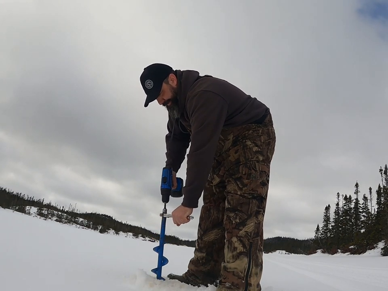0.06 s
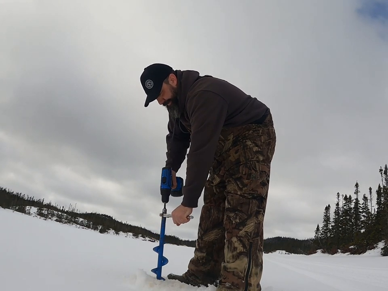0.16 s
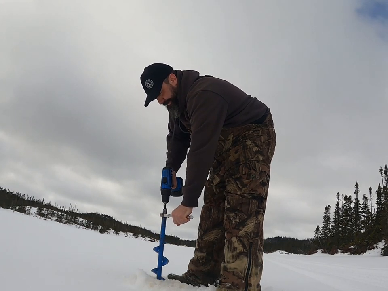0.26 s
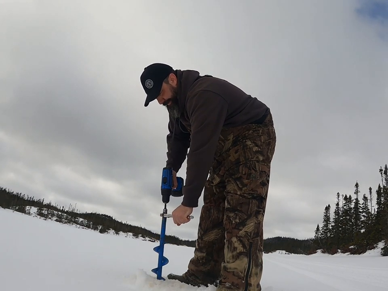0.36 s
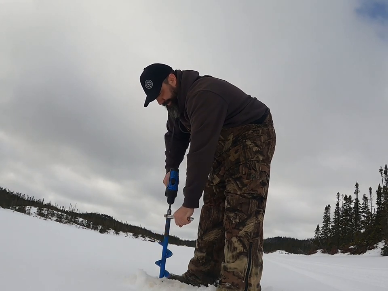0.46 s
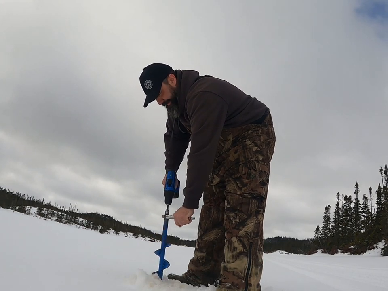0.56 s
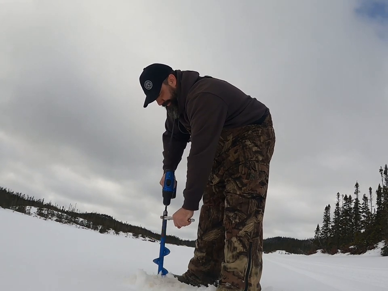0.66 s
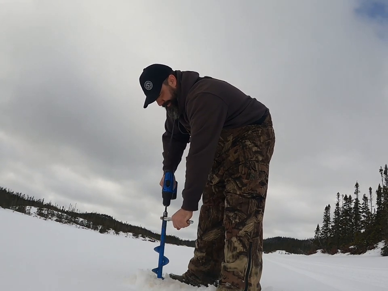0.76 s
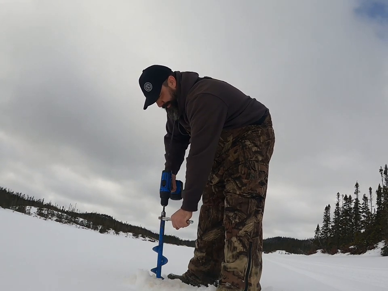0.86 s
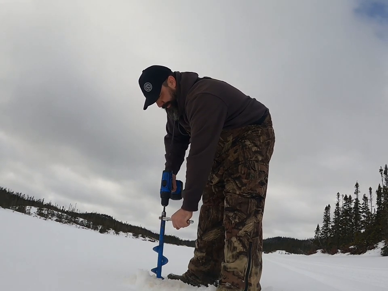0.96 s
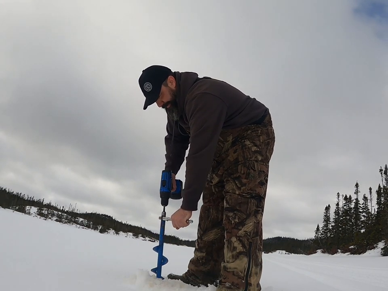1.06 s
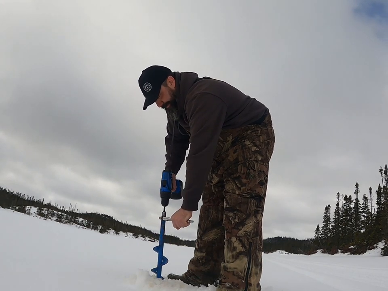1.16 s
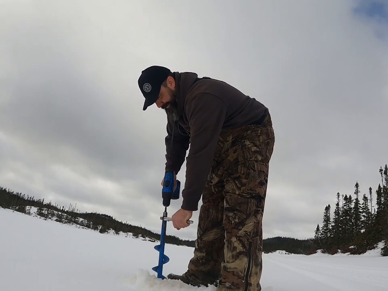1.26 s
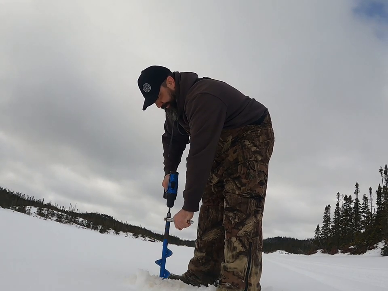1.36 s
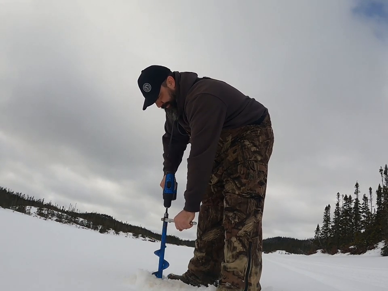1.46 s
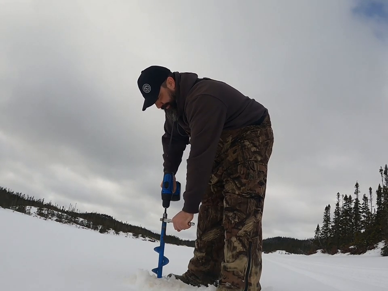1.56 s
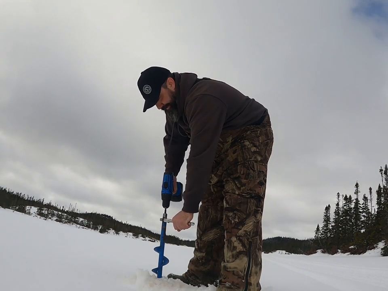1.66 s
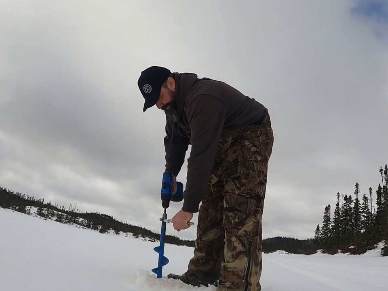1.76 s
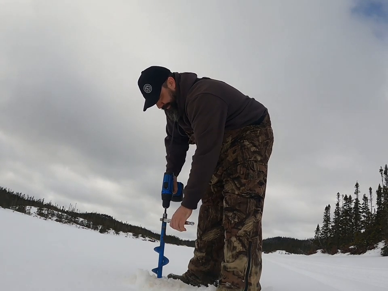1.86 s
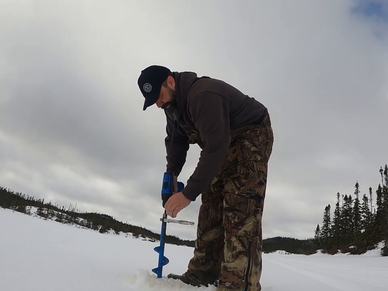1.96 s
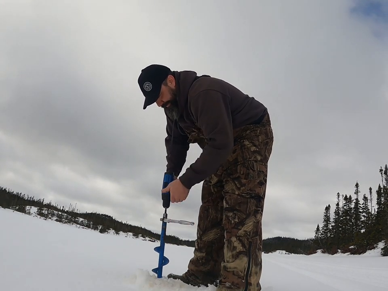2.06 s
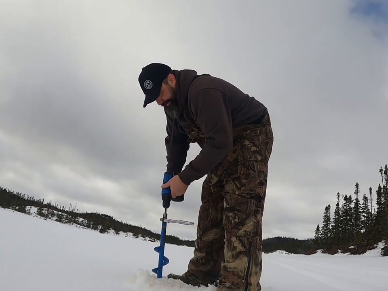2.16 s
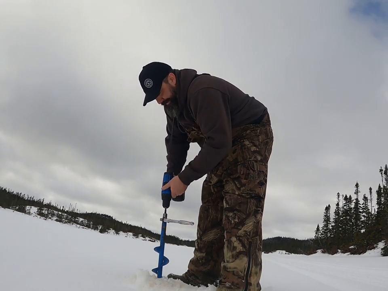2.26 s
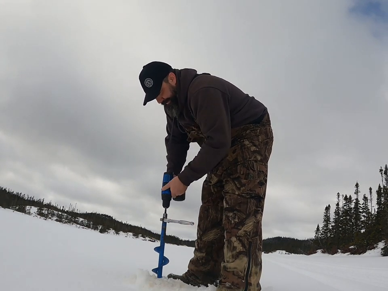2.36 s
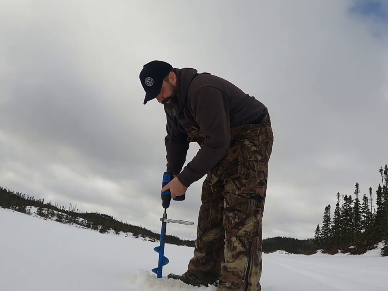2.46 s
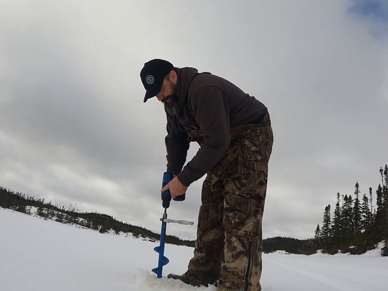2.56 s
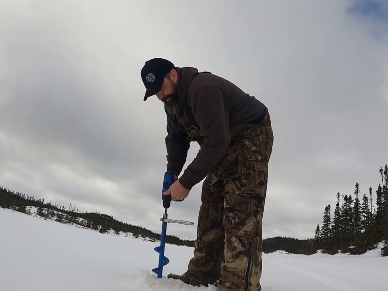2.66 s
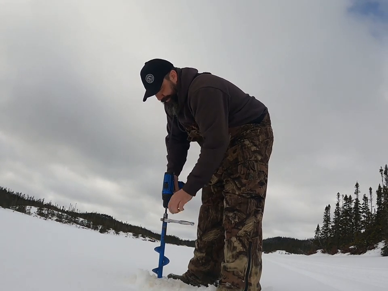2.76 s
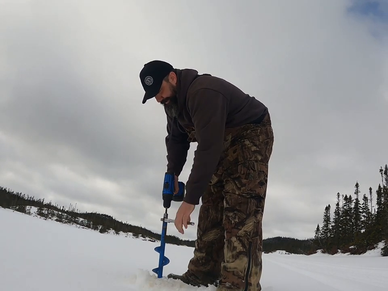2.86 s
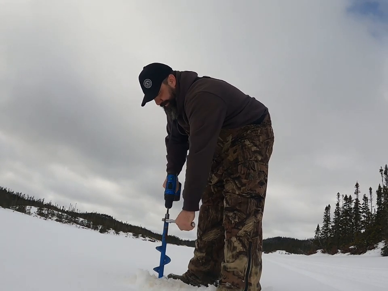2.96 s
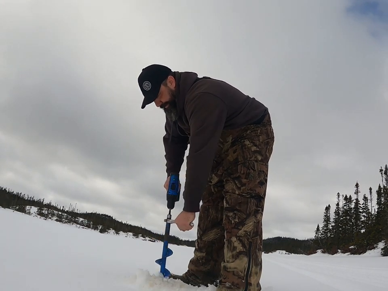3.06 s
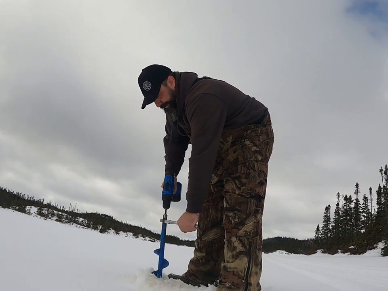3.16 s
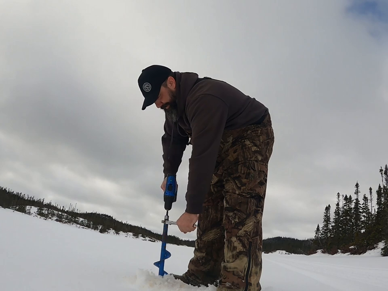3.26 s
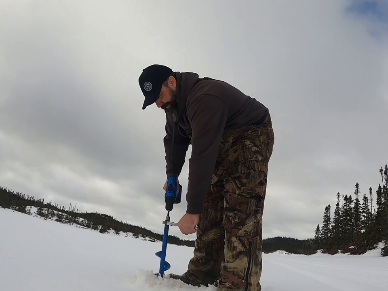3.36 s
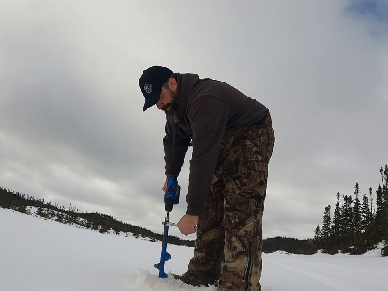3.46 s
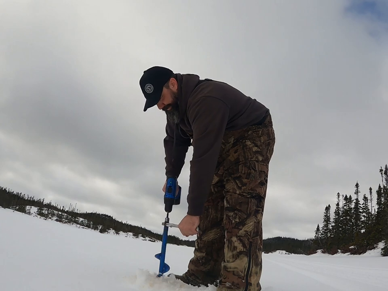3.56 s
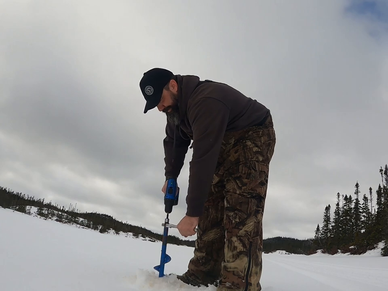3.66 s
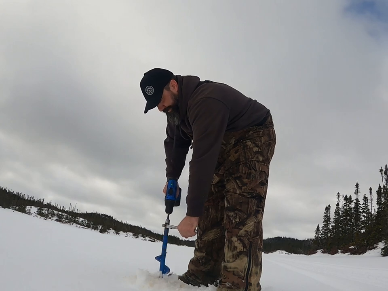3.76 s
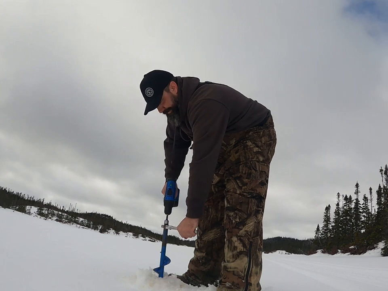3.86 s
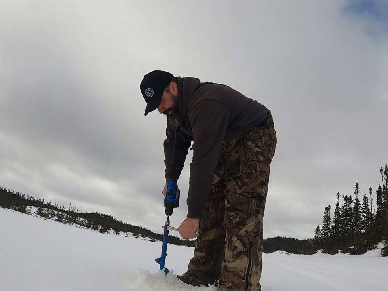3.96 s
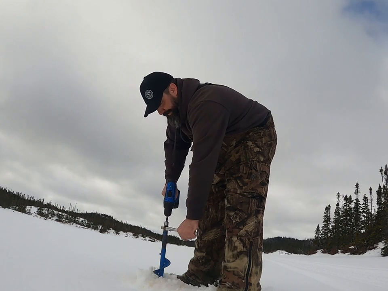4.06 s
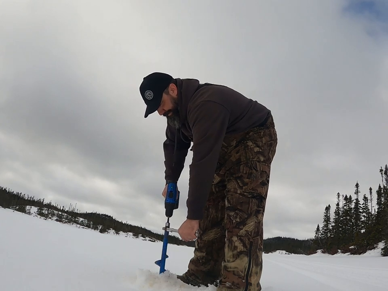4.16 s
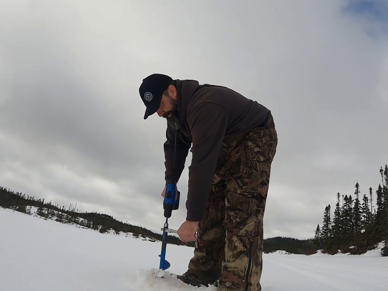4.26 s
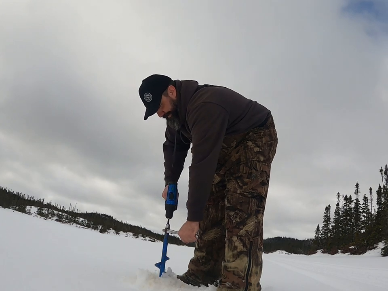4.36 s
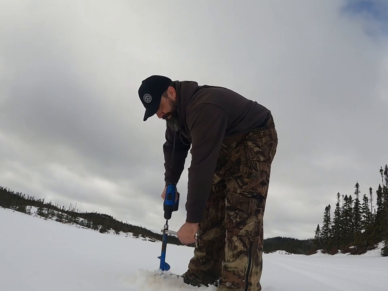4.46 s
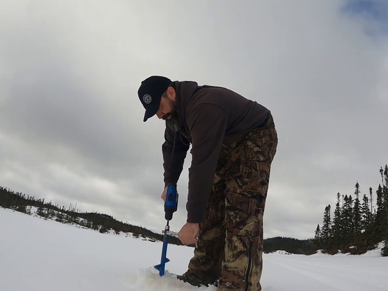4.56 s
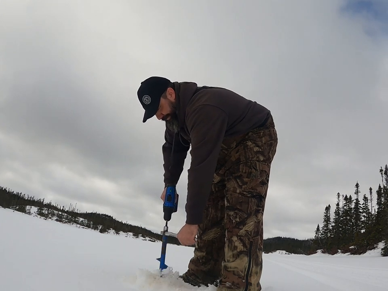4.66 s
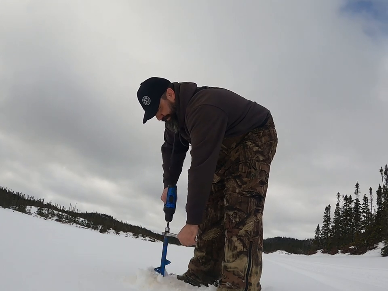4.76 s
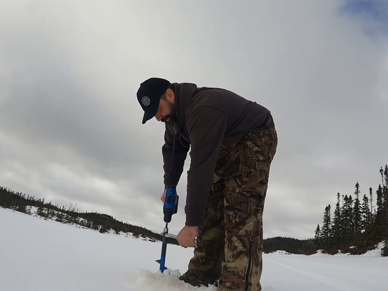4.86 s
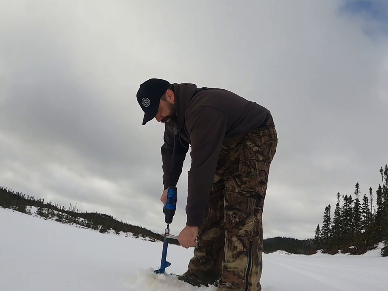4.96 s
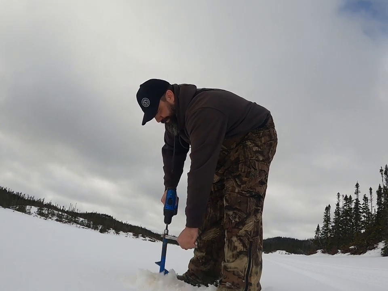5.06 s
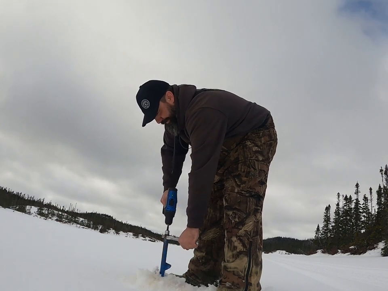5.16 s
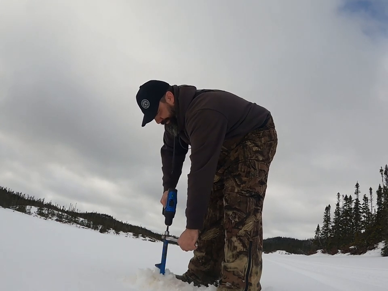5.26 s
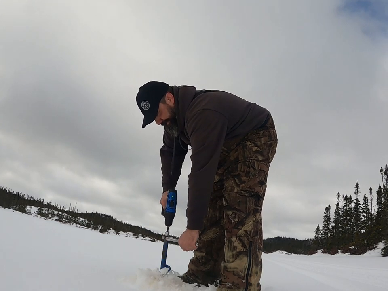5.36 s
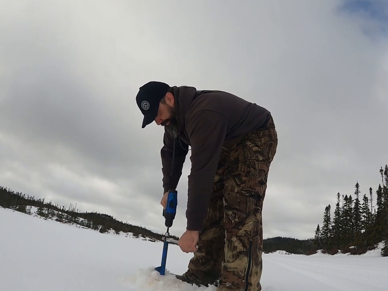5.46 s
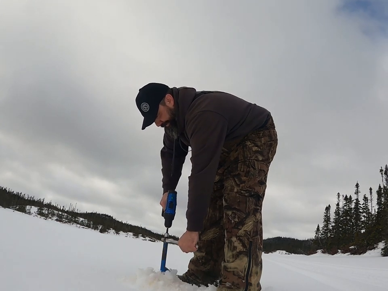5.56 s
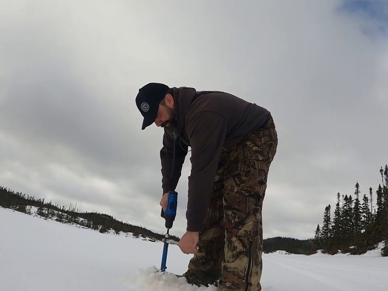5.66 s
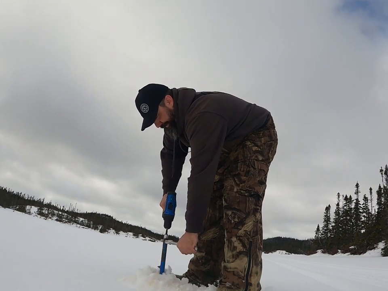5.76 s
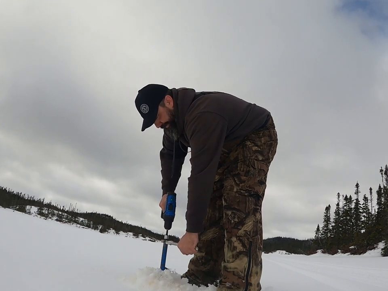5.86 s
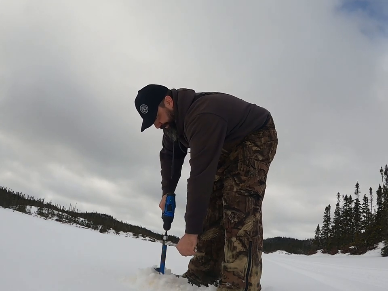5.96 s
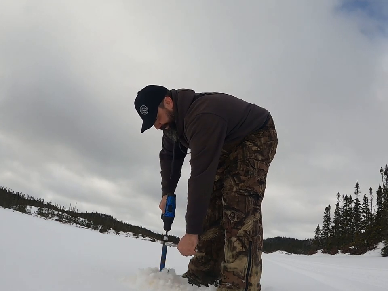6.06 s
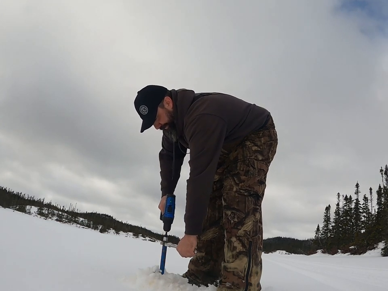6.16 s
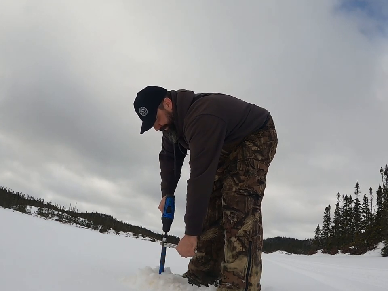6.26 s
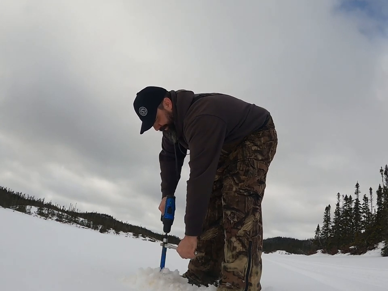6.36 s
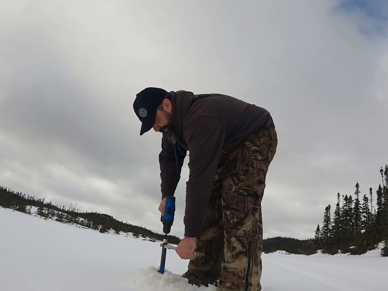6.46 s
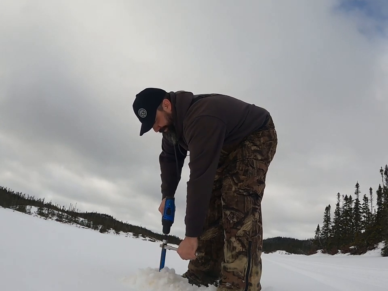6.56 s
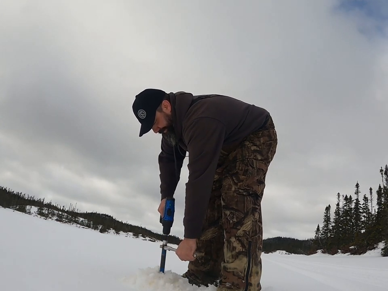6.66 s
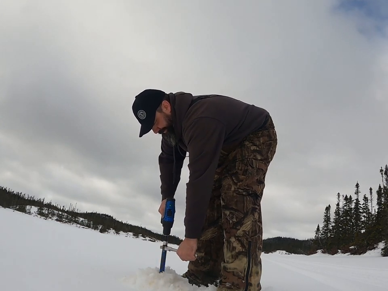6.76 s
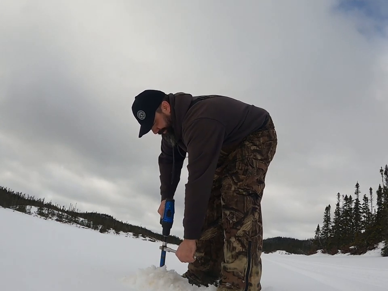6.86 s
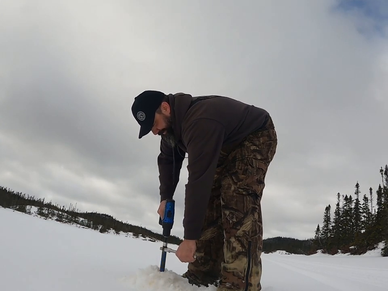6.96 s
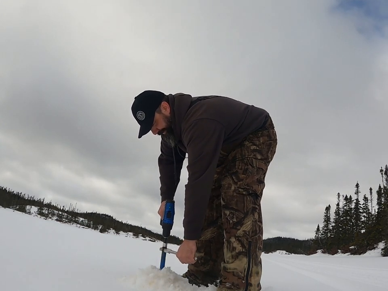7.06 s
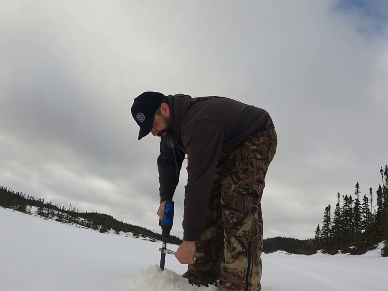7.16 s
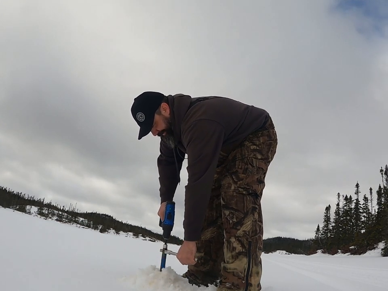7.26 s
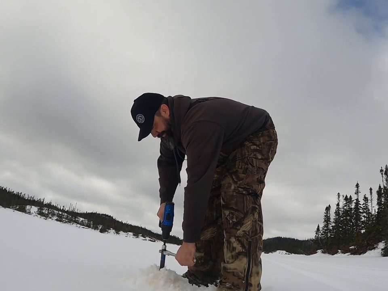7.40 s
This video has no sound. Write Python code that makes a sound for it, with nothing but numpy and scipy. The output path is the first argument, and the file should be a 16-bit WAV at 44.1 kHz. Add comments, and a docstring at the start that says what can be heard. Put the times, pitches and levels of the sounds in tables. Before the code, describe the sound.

Close outdoor sound on a frozen lake, dry and open, nearly centred. A drill burst is already ending and cuts off at 0.05 s; a light clack at 0.14 and small ticks of ice and metal follow. At 0.5 a clack starts a rough geared whir, climbing and sagging until 0.88, with bright scraping, low thrum and a ringing steel edge near 7 kHz. Snow crunches, ticks and a soft wind rumble fill the gap. A shorter burst runs 1.36-1.63, faltering briefly, then clacks at 1.7. Near quiet follows, with faint snow shuffles and a dry plastic click at 2.54. At 3.05 a strong clack launches the continuous run, its gear whine rising quickly to about 3 kHz. From 4.8 scraping and ringing fade; around 5.3 the whine drops toward 2.65 kHz and strengthens, wavering under load. Deep wind buffets, strongest near 5.4, continue to the end at about 7.4.

```python
"""On a frozen lake in light wind, a cordless drill close ahead turns a steel auger: three bursts, then a long run.
Geared noise shakes the housing, a phase-driven whine grows as load slows the motor, and modes ring the flighting.
The blades scrape and thrum in coloured noise; the ringing and scraping fade as the steel sinks into the hole.
Short bursts of noise make chuck clacks, ticks and a selector click; clumped noise is snow, and a breeze
buffets the microphone."""
import sys
import numpy as np
from scipy import signal
from scipy.fft import rfft, irfft, next_fast_len
from scipy.io import wavfile
from scipy.ndimage import map_coordinates

SR = 44100
rng = np.random.default_rng(int(sys.argv[2]) if len(sys.argv) > 2 else 0)


def put_to_file(sound):
    """Save the sound as 16-bit audio at rate SR, in the file named by the first command-line argument."""
    columns = np.atleast_2d(sound).T  # one column per channel
    safe = np.clip(columns, -1, 1)
    whole_steps = np.round(safe * 32767)
    wavfile.write(sys.argv[1], SR, whole_steps.astype(np.int16))


N = 327663
TIME = np.arange(N) / SR

# trigger pulls: on_s, off_s, drive start_db, drive full_db, rise_s
PULLS = [(-.05, 0.052, -25, -23.5, .05), (0.502, 0.882, -25.5, -23, 0.23), (1.359, 1.626, -27.5, -23, 0.21),
         (3.052, 7.6, -31, -23.5, 0.078)]
# tooth rate in the long run, before small wavers: time_s, rate_hz
TOOTH_RATE = [(3.08, 2215), (3.13, 2515), (3.19, 2694), (3.29, 3005), (3.7, 3018), (4.07, 2990),
              (4.35, 3022), (5.21, 2985), (5.33, 2865), (5.54, 2712), (5.66, 2760), (5.8, 2675),
              (6.0, 2620), (6.12, 2690), (6.3, 2635), (6.65, 2705), (7.1, 2640), (7.42, 2660)]
# the chuck takes up its play: start_s, level_db before trims, fade_s (by 60 dB)
CHUCK = [(0.14, -32, 0.022), (0.509, -20, 0.039), (1.3612, -20, .027), (1.681, -33, 0.058),
         (1.708, -24, 0.059), (3.052, -16, 0.021)]


def amp(db):
    """Decibels to gain."""
    return 10 ** (np.asarray(db) / 20)


def unit(x):
    """Scaled to rms 1."""
    return x / np.sqrt(np.mean(x ** 2) + 1e-20)


def along(points, hz):
    """Value at hz, interpolated between (Hz, value) points on a log frequency axis."""
    f, v = np.transpose(points)
    return np.interp(np.log(hz + 1), np.log(f + 1), v)


def curves(rows):
    """One value per sample for each column after the time."""
    s, *cols = np.transpose(rows)
    return [np.interp(TIME, s, c) for c in cols]


def wobble(rate):
    """A smooth random curve, rate knots a second."""
    knots = rng.standard_normal(int(N * rate / SR) + 4)
    return map_coordinates(knots, [TIME * rate])


def filtered(x, response):
    """x shaped by a complex response of frequency."""
    m = next_fast_len(N + SR // 4)
    hz = np.fft.rfftfreq(m, 1 / SR)
    return irfft(rfft(x, m) * response(hz), m)[..., :N]


def coloured(x, spectrum):
    """x with a broad colour, at rms 1."""
    return unit(filtered(x, lambda hz: amp(along(spectrum, hz))))


def resonances(modes, f):
    """Causal response of damped modes (Hz, width Hz, dB), summed."""
    return sum(amp(db) * 1j * f * w / (c * c - f * f + 1j * f * w) for c, w, db in modes)


def noise_pair():
    """White noise at the two microphone ports, generally less alike towards the treble."""
    # left-right likeness: frequency_hz, correlation (0 to 1)
    likeness = [(200, 0.99), (700, 0.94), (2500, 1), (4500, 0.97), (8000, 0.91), (10500, .8), (13000, .2)]

    def mid_side(hz):
        turn = np.arccos(np.clip(along(likeness, hz), -1, 1)) / 2
        return np.array([np.cos(turn), np.sin(turn)])

    mid, side = filtered(rng.standard_normal((2, N)), mid_side)
    return np.array([mid + side, mid - side])


def bursts(rows):
    """Envelope of short contacts, a quick rise and exponential fade: (s, dB, seconds to fade by 60 dB)."""
    level, t = np.zeros(N + SR), np.arange(SR // 8) / SR
    rise = 1 - np.exp(-t / 0.00059)
    for s, db, t60 in rows:
        level[round(s * SR):][:len(t)] += amp(db - 60 * t / t60) * rise
    return level[:N]


def swell(s, db, rise_db_per_s, fall_db_per_s):
    """Gain that climbs to a peak at time s and falls away, both straight in dB."""
    before_s, after_s = np.maximum(s - TIME, 0), np.maximum(TIME - s, 0)
    return amp(db - abs(rise_db_per_s) * before_s - abs(fall_db_per_s) * after_s)


def effort(coast_db_per_s):
    """Gain of the drive: the motor starts at once, effort builds as the blades bite, the brake stops it."""
    start_s = 0.0066
    skid_s, skid_width_s, skid_db = 1.475, 0.013, -5.5  # the blades lose their bite for a moment
    drive = np.zeros(N)
    for on, off, start_db, full_db, rise_s in PULLS:
        started = np.clip((TIME - on) / start_s, 0, 1)
        braked = amp(-coast_db_per_s * np.maximum(TIME - off, 0))
        drive += started * braked * amp(np.interp(TIME, [on, on + rise_s], [start_db, full_db]))
    return drive * amp(skid_db * np.exp(-((TIME - skid_s) / skid_width_s) ** 2))


def mesh():
    """Tooth rate in Hz and whine level in dB: the slower the motor runs, the harder the teeth press."""
    free_hz, droop_hz = 3016, 170  # unloaded tooth rate, and the drop that sets the scale of the load
    whine_base_db, loaded_db, flutter_db = -31.5, 6.5, 1.45
    bite_per_s, bite_share = 3.6, .004  # the bite of the blades comes round and moves the speed
    waver_per_s, waver_share = 20, .0035  # uneven ice moves it at random
    speed_hz, = curves(TOOTH_RATE)
    load = np.tanh(np.maximum(free_hz - speed_hz, 0) / droop_hz)
    whine_db = whine_base_db + loaded_db * load + flutter_db * wobble(14)
    bite = bite_share * np.sin(2 * np.pi * bite_per_s * TIME + wobble(2))
    return speed_hz * (1 + bite + waver_share * wobble(waver_per_s)), whine_db


def gearbox(drive):
    """Teeth strike at random force once a mesh cycle and shake the housing; their regular part whines."""
    # gearbox and shaft resonances: centre_hz, width_hz, level_db (relative)
    housing = [(1703, 170, -4.5), (1930, 140, -10), (2730, 280, -1.5), (2928, 115, -2), (3430, 92, -1),
               (3850, 310, -7), (4500, 200, -7.5), (5160, 320, -12), (6500, 350, -13), (7330, 410, -16.5),
               (7570, 40, 3), (7900, 160, -18), (8980, 500, -12)]
    # broad colour of the rattle: frequency_hz, level_db (relative)
    rattle_colour = [(100, -40), (280, -10), (460, -14), (620, -8.5), (830, -7), (1020, -3), (1400, -3),
                     (2400, 2.5), (3600, -2), (4900, -6.5), (7000, -9.5), (8500, -15), (11000, -33.5),
                     (15000, -57)]
    mesh_hz, whine_db = mesh()
    phase = 2 * np.pi * np.cumsum(mesh_hz * (1 + 0.002005 * wobble(45))) / SR
    teeth = 1 + 0.56 * np.cos(phase)
    chatter = amp(0.73 * wobble(420) + 0.98 * wobble(40))
    # three sets of resonances are shaken harder or softer as the load shifts round the gears
    shaken = 0
    for k in range(3):
        response = lambda f: resonances(housing[k::3], f) / (1 + (f / 11000) ** 6)
        shaken = shaken + amp(1.14 * wobble(22)) * filtered(noise_pair() * teeth, response)
    broad = coloured(noise_pair() * teeth, rattle_colour)
    rattle = chatter * (amp(-5.0) * unit(shaken) + amp(-2.5) * broad)
    # uneven teeth smear the whine into a skirt of sidebands
    uneven = phase + 0.45 * wobble(380)
    whine = (1 + 0.41 * wobble(260)) * (np.sin(uneven) + amp(-14.0) * np.sin(2 * uneven))
    long_run = np.clip((TIME - TOOTH_RATE[0][0]) / 0.06, 0, 1)
    return drive * rattle + amp(whine_db) * long_run * whine


def blades(drive, free_db):
    """Edges shave the ice in tiny fractures and the sheet thrums; depth muffles both and lowers the thrum."""
    # colour of the shaving: frequency_hz, level_db (relative)
    scrape_colour = [(2000, -31), (6000, 9.5), (7700, -3.5), (8450, -10), (9500, -2), (10400, -2),
                     (11500, 0.5), (13000, -4.5), (14200, -15.5), (15000, -22.5)]
    # colour of the thrum in a shallow hole: frequency_hz, level_db (relative)
    thrum_colour = [(30, -42), (70, -19.5), (120, -11.5), (190, 2), (232, -1.5), (278, -11.5), (450, -22),
                    (900, -62)]
    sink_from_s, sink_to_s, deep_pitch = 3.2, 5.0, 0.839  # final pitch of the thrum over the first
    jolt_db, jolt_s = -19.5, 0.12  # each clack sets the auger thrumming: level offset, 60 dB fade
    fractures = noise_pair() * amp(6.4 * wobble(900))
    shaving_db = -13.5 + 0.83 * free_db + 0.49 * wobble(35)
    shaving = amp(shaving_db) * coloured(fractures, scrape_colour)
    depth = np.interp(TIME, [sink_from_s, sink_to_s], [0, 1])
    shallow = coloured(noise_pair(), thrum_colour)
    deep = coloured(noise_pair(), [(hz * deep_pitch, db) for hz, db in thrum_colour])
    # equal-power crossfade as the hole deepens
    thrum = amp(-13.0 + 0.38 * free_db) * (np.sqrt(1 - depth) * shallow + np.sqrt(depth) * deep)
    jolts = bursts([(s, db + jolt_db, jolt_s) for s, db, _ in CHUCK])
    return drive * (shaving + thrum) + jolts * shallow


def flighting(shake, free_db):
    """The steel spiral rings on after each shake; ice and slush damp its level as it goes down."""
    # modes of the steel spiral: centre_hz, width_hz, level_db (relative)
    steel = [(7150, 22, 1), (7246, 130, -8.5), (7440, 58, -10.5), (9430, 540, -22), (11400, 270, -28.5),
             (12170, 150, -31)]
    return amp(free_db + 17) * filtered(shake * noise_pair(), lambda f: resonances(steel, f))


def turbulence(spectrum):
    """Lumpy pressure at the two ports, only partly alike, at rms 1."""
    own = amp([[-4], [-2]]) * rng.standard_normal((2, N))  # each port's own share
    eddying = rng.standard_normal(N) + own
    return coloured(eddying * amp(0.65 * wobble(29)), spectrum)


def airflow(steady, puffs, db_per_s):
    """Gain of a steady flow with puffs that rise and fall alike; the strongest at each moment counts."""
    flow = amp(curves(steady)[0])
    return np.max([flow] + [swell(s, db, db_per_s, db_per_s) for s, db in puffs], axis=0)


def wind():
    """Faint open air, a few deep eddies, and a growing, gusty breeze that buffets the microphone."""
    # colours of the open air, the buffeting and the deep rumble: frequency_hz, level_db (relative)
    air_colour = [(25, -10), (90, -13), (170, 3.5), (260, -3), (450, -11), (800, -11), (1250, -3.5),
                  (1700, -10), (2600, -22), (4000, -33), (7000, -31.5), (15000, -48)]
    buffet_colour = [(12, -6.5), (32, 6), (60, -2), (100, -2.5), (150, -14), (250, -20), (450, -35),
                     (1200, -76.5)]
    rumble_colour = [(10, -4.5), (27, 1.5), (42, -6.5), (65, -21.5), (110, -35), (300, -74)]
    # slow eddies at the microphone between the bursts: peak_s, rumble level_db
    eddies = [(.39, -44.5), (.6, -48), (.93, -38.5), (1.22, -48.5), (1.365, -32), (1.65, -52.5)]
    # the light air that carries them dies away: time_s, rumble level_db
    drift = [(1.8, -61.5), (2.3, -79)]
    # the breeze picks up: time_s, buffet level_db before its random waver
    breeze = [(3.0, -95), (3.7, -62), (4.15, -52), (4.75, -52.5), (5.2, -37), (6.2, -33.5), (6.7, -31.5),
              (7.4, -32.5)]
    # gusts on top of it: peak_s, buffet level_db before its random waver
    gusts = [(1.39, -42), (1.59, -44.5), (4.19, -39), (4.68, -39.5), (5.04, -24), (5.391, -17), (5.57, -26),
             (5.79, -27.5), (6.57, -25.5), (6.8, -23.5), (7.1, -25)]
    buffet = airflow(breeze, gusts, 116) * amp(1.5 * wobble(9)) * turbulence(buffet_colour)
    rumble = airflow(drift, eddies, 172.5) * turbulence(rumble_colour)
    open_air = amp(-70.5 + 1.2 * wobble(4)) * coloured(noise_pair(), air_colour)
    return buffet + rumble + open_air


def snow():
    """Loose chips crunch in clumps: just before a pull, after it, and with each shuffle of feet."""
    # shuffles in the snow: peak_s, level_db, fade_db_per_s
    shuffles = [(.33, -68.5, 3), (1.1, -64.5, 63), (1.94, -68, 32.5), (2.46, -81, 63), (2.711, -72.5, 65)]
    # colour of the crunch: frequency_hz, level_db (relative)
    crunch_colour = [(200, -21), (700, -9.5), (1500, 1.5), (2300, -6), (3800, -9), (6000, -11),
                     (7600, -8.5), (8500, -19), (12000, -22.5), (15000, -38)]
    # chips stir as the auger takes the strain before a pull, and trickle down after it
    stir_db, stir_lead_s, stir_rise_db_per_s = -46.5, 0.0056, 750
    trickle_db, trickle_fall_db_per_s = -43.5, 159.5
    stirring = sum((TIME < on) * swell(on - stir_lead_s, stir_db, stir_rise_db_per_s, 0) for on, *_ in PULLS)
    trickling = sum((TIME > off) * swell(off, trickle_db, 0, trickle_fall_db_per_s) for _, off, *_ in PULLS)
    shuffling = sum(swell(s, db, 350, fade) for s, db, fade in shuffles)
    clumps = noise_pair() * amp(2.2 * wobble(900) + 1.9 * wobble(80))
    return np.hypot(stirring + trickling, shuffling) * coloured(clumps, crunch_colour)


def tick_strikes():
    """Strike envelope of the ticks: each bounces twice, weaker each time."""
    # small ticks of ice and loose metal: start_s, level_db before trims
    tick_times = [(.1027, -32), (0.263, -38), (0.2738, -33), (0.4, -41.5), (.9704, -52), (1.008, -37),
                  (1.08, -47), (1.108, -41), (1.1192, -31.5), (1.17, -44.5), (1.8257, -41), (1.8378, -33),
                  (2.4394, -49), (2.4512, -48), (2.669, -63), (2.8486, -56.5), (3.0266, -38), (3.0454, -30)]
    rebound_s, rebound_loss_db = .0092, 5.5
    return bursts([(s + k * rebound_s, db - k * rebound_loss_db, .018) for s, db in tick_times for k in range(3)])


def ticks(strikes):
    """Ice and loose metal tick: each strike is a brief burst of bright noise."""
    # colour of a tick: frequency_hz, level_db (relative)
    tick_colour = [(300, -44), (1200, 1), (2800, 2), (4500, 2.5), (7000, -0.5), (10000, -9), (15000, -21.5)]
    return amp(-7.5) * strikes * coloured(noise_pair(), tick_colour)


def chuck():
    """The chuck clacks as it takes up its play: short bursts of mid-heavy noise."""
    # colour of a clack: frequency_hz, level_db (relative)
    clack_colour = [(150, -6), (500, 2), (760, -6), (1400, 8.5), (2100, -6.5), (3200, -1), (5000, -12),
                    (8000, -16.5), (12000, -35), (15000, -36)]
    return amp(-5.5) * bursts(CHUCK) * coloured(noise_pair(), clack_colour)


def spin_up(drive):
    """The motor whirs up and sags in the second pull: a rough tone with a strong third harmonic."""
    # the whir: time_s, pitch_hz, level_db relative to the drive, before its flutter
    whir = [(.55, 880, -23.5), (.72, 1116, -15), (.79, 1152, -10.5), (.9, 1052, -16)]
    hz, db = curves(whir)
    phase = 2 * np.pi * np.cumsum(hz) / SR + 0.31 * wobble(130)
    second_pull = (TIME > PULLS[1][0]) & (TIME < PULLS[2][0])
    tone = np.sin(phase) + amp(3.5) * np.sin(3 * phase)
    return second_pull * drive * amp(db + 2.3 * wobble(70)) * tone


def selector():
    """The drill's selector is pushed over: a dry plastic click, too small to radiate bass."""
    # parts of the click: start_s, level_db before the high-pass, fade_s (by 60 dB)
    contacts = [(2.529, -50, 0.11), (2.5415, -36.5, 0.019), (2.5455, -28, 0.011)]
    # colour of the click: frequency_hz, level_db (relative)
    click_colour = [(350, -45), (600, -24), (780, 5), (1400, 6.5), (2100, -7), (3200, 1), (5000, -10.5),
                    (8000, -11), (12000, -26), (15000, -31)]
    click = bursts(contacts) * coloured(noise_pair(), click_colour)
    return signal.sosfilt(signal.butter(6, 700, "highpass", fs=SR, output="sos"), click)


def ports(hz):
    """Response of the left and right microphone ports to a source just right of centre."""
    # lag of the left port: frequency_hz, phase_radians
    lag = [(200, .04), (1200, .22), (3000, 0.6), (5200, 0.65), (10600, .15)]
    # left minus right: frequency_hz, level_db
    balance = [(200, 0), (500, -1.5), (1260, -1), (4300, .5), (7900, 0.4), (14000, -2)]
    half = np.array([[.5], [-.5]])
    return amp(half * along(balance, hz)) * np.exp(-1j * half * along(lag, hz))


def scene():
    """Drill and auger stand almost straight ahead, their sound reaching the right port a shade earlier."""
    # how freely the flighting rings as it sinks: time_s, level_db (relative)
    free_steel = [(0, -1.8), (1.6, -0.9), (3.1, -3.5), (4.1, -2.2), (4.8, -6.5), (6.2, -12.5)]
    drive = effort(coast_db_per_s=853)
    free_db, = curves(free_steel)
    strikes = tick_strikes()
    auger = blades(drive, free_db) + flighting(drive + .25 * strikes, free_db)
    drill = gearbox(drive) + spin_up(drive) + chuck() + selector()
    ahead = drill + auger + ticks(strikes) + snow()
    return filtered(ahead, ports) + wind()


def record(dry):
    """The microphone dulls the top, and nothing passes above its band limit."""
    top_hz = 15050

    def response(hz):
        dull = amp(along([(12800, 0), (14000, 0.0), (15000, -10.5)], hz))
        return dull * np.clip((top_hz - hz) / 200, 0, 1)

    return filtered(dry, response)


dry = scene()
out = record(dry)
put_to_file(out)
```